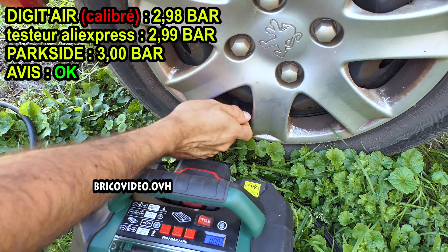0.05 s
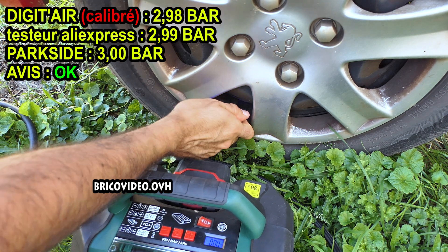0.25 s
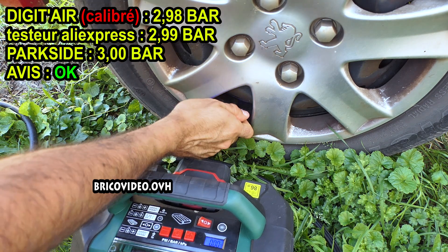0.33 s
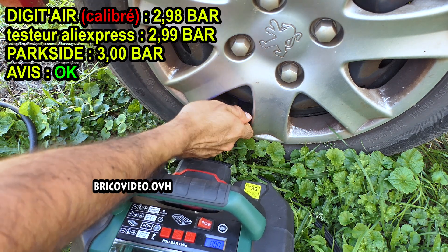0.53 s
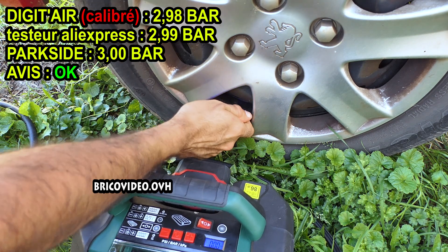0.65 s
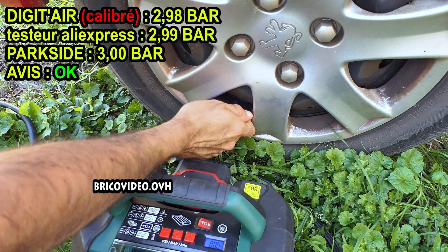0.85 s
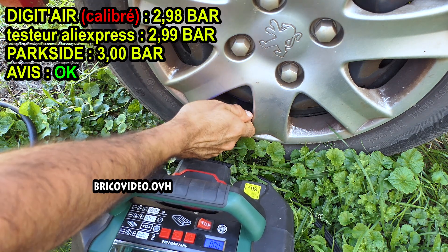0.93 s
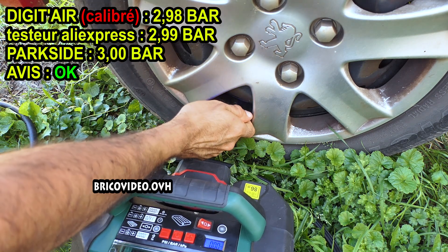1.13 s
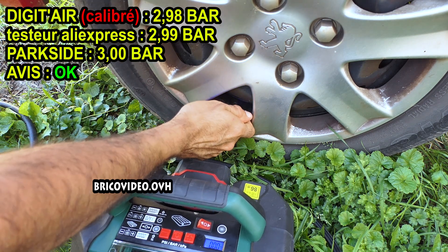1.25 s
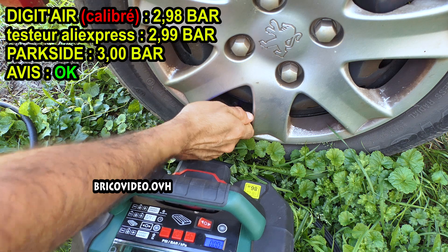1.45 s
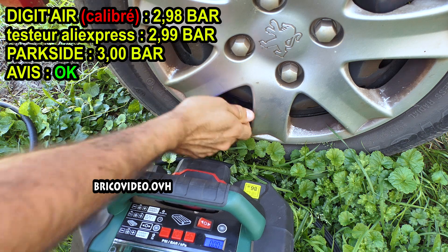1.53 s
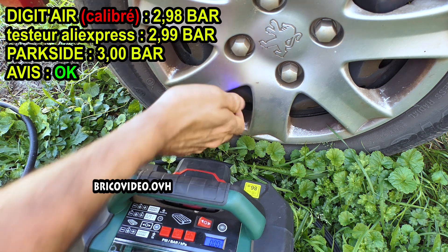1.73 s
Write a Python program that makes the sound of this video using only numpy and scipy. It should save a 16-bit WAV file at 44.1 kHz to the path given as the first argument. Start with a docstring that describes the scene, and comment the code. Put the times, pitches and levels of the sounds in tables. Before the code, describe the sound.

Air jets from a car tyre valve, close and bright. A tiny puff comes at 0.04 s, then a strong hiss from 0.2 to 0.68 s, gaining thin high whistles. Only faint seeping and a small puff near 0.8 s follow. A short sharp spit bursts at 1.5 s, then quick light knocks and a soft hand brush around 1.57-1.65 s. A faint distant motor hums throughout, dipping near 1.4 s, over quiet outdoor air.

```python
"""A hand-held gauge is pressed on a car tyre valve, outdoors: air jets past the seal in a long hiss that
starts to whistle, then spits again as the gauge is pulled off. The air is shaped noise, with narrow bands
of noise for the whistles, small puffs and a faint seep. The gauge then knocks against the wheel: cracks of
noise and fading tones, with a hand brushing away. A distant motor, a stack of sine tones, hums throughout
and sags briefly under load, over soft outdoor noise."""
import sys
import numpy as np
from scipy import signal
from scipy.fft import rfft, irfft, next_fast_len
from scipy.io import wavfile
from scipy.ndimage import map_coordinates

SR = 44100
rng = np.random.default_rng(int(sys.argv[2]) if len(sys.argv) > 2 else 0)


def bounce(signal):
    """Save signal as a 16-bit WAV file at the path given by the first command-line argument."""
    frames = np.transpose(np.atleast_2d(signal))
    limited = np.clip(frames, -1, 1)
    pcm = np.round(limited * 32767).astype(np.int16)
    wavfile.write(sys.argv[1], SR, pcm)


N = 79380
T = np.arange(N) / SR  # time of every sample, in seconds

# Outdoor air. Each row: frequency in Hz, relative level in dB per Hz.
AIR_COLOUR = [(25, -97.5), (50, -78.5), (100, -79.5), (200, -79), (260, -77.5), (320, -70), (420, -77.5),
              (510, -83.5), (610, -76), (780, -80.5), (1150, -79), (1600, -82), (3300, -92), (6000, -97.5),
              (10000, -94), (15800, -103)]
# How alike left and right are in wide, diffuse sounds. Each row: frequency in Hz, likeness (1 = the same).
AIR_ALIKE = [(40, .4), (130, .1), (350, 0.36), (700, 0.3), (2000, .4), (10000, .4)]
# The same for sounds close by. Each row: frequency in Hz, likeness (1 = the same).
NEAR_ALIKE = [(500, .65), (1300, .68), (3000, 0.96), (6000, 0.93), (10000, 0.87), (14000, 0.59)]
# The motor's course. Each row: time in seconds, average speed in turns per second, relative level in dB.
MOTOR_COURSE = [(0, 177.9, -64), (.17, 175.5, -61.5), (.5, 178.3, -67), (.75, 178.9, -68.5),
                (1.0, 178.8, -64), (1.27, 179.6, -63.5), (1.391, 170.4, -65.5), (1.501, 173.5, -62.5),
                (1.62, 179.7, -65.5), (1.8, 178.8, -62.5)]
# The motor's tones. Each row: multiple of the turning speed, average relative level in dB.
MOTOR_ORDERS = [(2, -3.5), (4, -0.5), (5, -7), (6, -20), (7, -16), (8, -25.5), (9, -14), (10, -24.5)]
# The low rumble stirred by the parting blast. Each row: frequency in Hz, relative level in dB per Hz.
BUFFET_COLOUR = [(25, -18.5), (60, -2), (150, 0), (400, -11), (900, -13), (1400, -16), (3000, -44.5)]
# The hand brushing away. Each row: time in seconds, level in dB.
BRUSH_LEVEL = [(1.58, -81), (1.63, -54), (1.68, -66), (1.8, -67.5)]
# The brush's colour. Each row: frequency in Hz, relative level in dB per Hz.
BRUSH_COLOUR = [(300, -12), (1100, -6), (3500, -17.5), (9000, -24), (16000, -32.5)]
# The gauge knocking on the wheel. Each row: start in seconds, relative level in dB,
# hardness as a low-pass frequency in Hz.
KNOCKS = [(1.5708, -32, 900), (1.5828, -42, 4000), (1.5875, -24, 5500), (1.6025, -25, 3993),
          (1.6068, -37, 4000), (1.6098, -28.5, 7000), (1.6158, -31, 6000), (1.6205, -36, 3000)]
# What rings with every knock. Each row: frequency in Hz, average relative level in dB,
# time to fade by 60 dB in seconds.
GAUGE_RINGS = [(950, -9, 0.018), (1125, -0.5, 0.032), (1300, -2.5, 0.026), (1715, -2, 0.027),
               (2403, -6.5, 0.028), (3340, -8.5, 0.039), (4060, -10, 0.037), (5110, -12, 0.015),
               (6400, -20, .02)]
# The crack of each knock. Each row: frequency in Hz, relative level in dB per Hz.
CRACK_COLOUR = [(300, -46), (800, -3), (1500, 3), (4000, -3.5), (8000, -7.5), (12000, -12), (16000, -30)]
# Air seeping past the gauge. Each row: time in seconds, level in dB.
SEEP_LEVEL = [(0, -82.5), (.04, -56.5), (.09, -75), (.17, -67.5), (.69, -66), (.78, -65.5), (.87, -69.5),
              (1.12, -70), (1.19, -81.5), (1.8, -75)]
# The seep's colour. Each row: frequency in Hz, relative level in dB per Hz.
SEEP_COLOUR = [(2500, -16), (5000, 0), (6500, -5), (10200, 1), (12000, -11), (16000, -21)]
# Small puffs as the gauge shifts. Each row: centre in seconds, spread either side in seconds, level in dB,
# centre frequency in Hz, spread either side in octaves.
PUFFS = [(.041, .004, -55, 10000, .25), (.041, .005, -56, 2500, .7), (.805, .008, -51, 13000, .2),
         (.806, .008, -60, 9000, .3), (.199, .005, -41, 10100, .06), (.98, .002, -63, 9500, .15),
         (.7, .04, -63, 7000, .22)]
# Edge tones of the seal. Each row: centre in seconds, spread either side in seconds, frequency in Hz,
# width in Hz, level in dB with the valve fully open.
WHISTLES = [(0.42, .04, 10360, 110, -30.5), (.39, .03, 10330, 160, -37.5), (.61, .04, 9670, 150, -33.5),
            (.555, .022, 6610, 70, -35), (.6, .05, 8657, 30, -43), (1.503, 0.017, 9560, 400, -23),
            (1.505, .01, 13900, 200, -32)]
# The jet as the gauge goes on. Each row: time in seconds, then relative levels in dB of the low rush,
# the hiss and the top fizz.
PRESS = [(.183,-70,-84,-80.5),(.191,-56,-47.5,-53),(.211,-43.5,-41,-41),(.227,-27,-23.5,-27),(.27,-26.5,-26.5,-28.5),(.305,-25.5,-27.5,-29.5),(.353,-29.5,-25.5,-28),(.383,-27.5,-23,-25.5),(.429,-28,-25,-28.5),(.555,-30.5,-21.5,-28.5),(.645,-30.5,-22.5,-30.5),(.665,-36,-31,-33),(.676,-48.5,-45.5,-51),(.706,-69,-61.5,-76)]
# The jet as the gauge comes off. Each row: time in seconds, then relative levels in dB of the low rush,
# the hiss and the top fizz.
RELEASE = [(1.43,-78,-73.5,-72),(1.449,-69,-54.5,-50),(1.468,-54.5,-44.5,-40.5),(1.486,-33.5,-33,-29),(1.502,-32.5,-27,-21.5),(1.511,-34,-27,-21),(1.526,-43,-45.5,-48),(1.545,-56.5,-55,-60),(1.578,-72,-71.5,-81)]
# The borders between low rush, hiss and top fizz: two frequencies in Hz.
BAND_EDGES_HZ = (5500, 10700)
# The jet's broad colour. Each row: frequency in Hz, relative level in dB per Hz.
JET_COLOUR = [(200, -33.5), (500, -33), (680, -20), (800, -28.5), (930, -13), (1050, -20), (1250, -7.5),
              (2100, -5.5), (3100, 0), (4000, -4), (4600, -8.5), (5600, -6.5), (9000, -5), (11200, -3),
              (12200, -6.5), (13400, -4.5), (14500, -6.5), (15800, -19)]
# Resonances of the gap between valve and gauge. Each row: frequency in Hz, width in Hz, lift in dB.
GAP_RESONANCES = [(2670, 240, 4.5), (3805, 240, 5), (6530, 200, 2), (7670, 250, 2.5), (8650, 250, 0.5),
                  (9640, 800, 5), (10330, 300, 3.5), (12900, 300, 4.5), (13900, 160, 4)]
# How the two microphones differ. Each row: frequency in Hz, left over right in dB.
BALANCE = [(60, -2.5), (300, -0.3), (700, -3.5), (1400, -3), (3000, 0), (8000, -.5), (14000, 0.7)]

AIR_DB, BUFFET_DB = -61.5, -40.5
MOTOR_PAN_DB = -2.5  # left over right
MOTOR_DRIFT, MOTOR_FADE_DB = .003, 2.5  # speed drift as a fraction; wander of each tone
ECHO_DB, ECHO_T60_S = -25.5, 0.17  # T60: time to fade by 60 dB
CRACK_DB, CRACK_T60_S, KNOCK_ATTACK_S = -2.5, 0.025, 0.00027
KNOCK_LOW_HZ = 656  # the small gauge radiates little below this
FLUTTER_DB, SPUTTER_DB = .5, 0.05  # slower and faster unsteadiness of the jet
HAND_DRIFT_S, HAND_DRIFT_RATE = .00002, 4  # shift of the reflections; random points a second
TOP_HZ = 15800  # nothing is kept from here up


def amp(db):
    """Turn decibels into a gain."""
    return 10 ** (np.asarray(db) / 20)


def unit(x):
    """Scale to an rms (average strength) of 1."""
    return x / np.sqrt(np.mean(x ** 2) + 1e-20)


def along(points, hz):
    """Read a curve of (Hz, value) points on a logarithmic frequency axis."""
    point_hz, value = np.transpose(points)
    return np.interp(np.log(hz + 1), np.log(point_hz + 1), value)


def levels(rows):
    """Give one gain curve over time for each dB column, silent outside the rows."""
    s, *columns = np.transpose(rows)
    inside = (T >= s[0]) * (T <= s[-1])
    return [amp(np.interp(T, s, db)) * inside for db in columns]


def wobble(rate):
    """Draw a smooth curve through this many random points a second."""
    return map_coordinates(rng.standard_normal(int(N * rate / SR) + 4), [T * rate])


def swell(centre_s, spread_s):
    """Rise and fall smoothly around one moment, in a bell curve."""
    return np.exp(-((T - centre_s) / spread_s) ** 2 / 2)


def peak(hz, centre_hz, width_hz):
    """Resonance curve: 1 at the centre, one half at the edges of its width."""
    return 1 / (1 + (2 * (hz - centre_hz) / width_hz) ** 2)


def filtered(x, response):
    """Multiply the spectrum of x by a response that depends on frequency."""
    size = next_fast_len(N + 8192)
    return irfft(rfft(x, size) * response(np.fft.rfftfreq(size, 1 / SR)), size)[..., :N]


def rush(gain, alike):
    """Stereo noise of rms 1: a shared part and an opposed part set how alike left and right are."""
    def response(hz):
        angle = np.arccos(np.clip(along(alike, hz), -1, 1)) / 2
        return gain(hz) * np.array([np.cos(angle), np.sin(angle)])

    mid, side = filtered(rng.standard_normal((2, N)), response)
    return unit(np.array([mid + side, mid - side]))


def coloured(points, alike):
    """Stereo noise of rms 1 with a spectrum given as (Hz, dB) points."""
    return rush(lambda hz: amp(along(points, hz)), alike)


def outdoor_air():
    """The soft outdoor background is steady, wide noise."""
    return amp(AIR_DB) * coloured(AIR_COLOUR, AIR_ALIKE)


def motor():
    """A far motor hums at multiples of its speed, each fading in its own way on the path to each microphone."""
    s, speed_hz, db = np.transpose(MOTOR_COURSE)
    turns = np.cumsum(np.interp(T, s, speed_hz) * (1 + MOTOR_DRIFT * wobble(20))) / SR
    hum = 0
    for order, level in MOTOR_ORDERS:
        fade = amp(level + MOTOR_FADE_DB * np.array([wobble(15), wobble(5.9)]))
        phase_wander = 0.28 * np.array([wobble(13), wobble(18)])  # radians
        hum += fade * np.sin(2 * np.pi * (order * turns + rng.random()) + phase_wander)
    pan_db = MOTOR_PAN_DB * np.array([[.5], [-.5]])
    return np.sqrt(2) * amp(np.interp(T, s, db) + pan_db) * hum


def buffet():
    """The parting blast also stirs a faint low rumble, which follows its hiss and fizz."""
    _, hiss, fizz = levels(RELEASE)
    return amp(BUFFET_DB) * (hiss + fizz) * coloured(BUFFET_COLOUR, AIR_ALIKE)


def echo(x):
    """A brief scatter from the car body and the garden: a fading burst of random reflections."""
    t = np.arange(SR // 4) / SR
    tail = rng.standard_normal((2, len(t))) * amp(-60 * t / ECHO_T60_S)
    tail /= np.linalg.norm(tail[0])
    return amp(ECHO_DB) * signal.fftconvolve(x, tail, axes=1)[:, :N]


def brush():
    """The hand brushing away is a short swell of noise that lingers."""
    return levels(BRUSH_LEVEL)[0] * coloured(BRUSH_COLOUR, AIR_ALIKE)


def knocks():
    """Each contact gives a short crack and rings the gauge; soft contacts are duller."""
    out, t = np.zeros((2, N + SR)), np.arange(SR // 8) / SR
    grit = coloured(CRACK_COLOUR, NEAR_ALIKE)
    for k, (s, db, hard_hz) in enumerate(KNOCKS):
        ring = 0
        for hz, level, t60 in GAUGE_RINGS:
            fading = amp(level + rng.normal(0, 1) - 60 * t / t60)
            ring += fading * np.sin(2 * np.pi * (hz * t + rng.random()))
        fresh_grit = grit[:, k * len(t):][:, :len(t)]  # a new stretch of noise for every knock
        crack = amp(CRACK_DB - 60 * t / CRACK_T60_S) * fresh_grit
        blow = (amp(-4.5) * ring + crack) * (1 - np.exp(-t / KNOCK_ATTACK_S))
        softened = signal.lfilter(*signal.butter(1, hard_hz, fs=SR), blow)
        out[:, round(s * SR):][:, :len(t)] += amp(db) * softened
    low_cut = signal.butter(3, KNOCK_LOW_HZ, 'high', fs=SR, output='sos')
    return signal.sosfilt(low_cut, out)[:, :N]


def leaks():
    """Air escapes in tiny puffs of narrow or wide noise, over a faint seep."""
    out = levels(SEEP_LEVEL)[0] * coloured(SEEP_COLOUR, NEAR_ALIKE)
    for s, spread_s, db, centre_hz, octaves in PUFFS:
        band = lambda hz: 1 / (1 + (np.log2((hz + 1) / centre_hz) / octaves) ** 2)
        out += amp(db) * swell(s, spread_s) * rush(band, NEAR_ALIKE)
    return out


def valve_open():
    """How strongly the jet is blowing, 0 to 1, judged by its hiss."""
    return np.minimum(1, (levels(PRESS)[1] + levels(RELEASE)[1]) / amp(-28))


def whistles():
    """Unsteady narrow tones, made of noise, swell where the jet grazes the seal."""
    out = np.zeros((2, N))
    for s, spread_s, centre_hz, width_hz, db in WHISTLES:
        tone = rush(lambda hz: peak(hz, centre_hz, width_hz), NEAR_ALIKE)
        out += amp(db) * swell(s, spread_s) * tone
    return out * valve_open()


def reflected(x, count=10, first_s=.0014, last_s=.008, size=0.17):
    """Near reflections off rim, hand and ground comb the sound; the hollows drift as the hand moves."""
    out = x.copy()
    for _ in range(count):
        delay = first_s + (last_s - first_s) * rng.random() ** 2  # squaring favours short delays
        delay = delay + HAND_DRIFT_S * wobble(HAND_DRIFT_RATE)
        late = np.array([map_coordinates(channel, [(T - delay) * SR]) for channel in x])
        out += size * rng.choice([-1, 1]) * late
    return out


def jet():
    """Turbulent air through the resonant gap is noise in three bands that swell and flutter separately."""
    def colour(hz):
        lift_db = sum(db * peak(hz, centre_hz, width_hz) for centre_hz, width_hz, db in GAP_RESONANCES)
        return amp(along(JET_COLOUR, hz) + lift_db)

    air = reflected(rush(colour, NEAR_ALIKE))
    out = np.zeros((2, N))
    for band, (press, release) in enumerate(zip(levels(PRESS), levels(RELEASE))):
        part = unit(filtered(air, lambda hz: np.digitize(hz, BAND_EDGES_HZ) == band))
        out += part * (press + release) * amp(FLUTTER_DB * wobble(60.7))
    return amp(-.5) * out * amp(SPUTTER_DB * wobble(400))


def scene():
    """The valve close by, over the motor and the outdoor air."""
    near = jet() + whistles() + leaks() + knocks() + brush()
    return near + echo(near) + buffet() + motor() + outdoor_air()


def record(dry):
    """The two microphones differ slightly in colour; nothing is kept above the band limit."""
    def response(hz):
        tilt_db = along(BALANCE, hz) * np.array([[.5], [-.5]])
        return amp(tilt_db) * (hz < TOP_HZ)

    return filtered(dry, response)


dry = scene()
out = record(dry)
bounce(out)
```